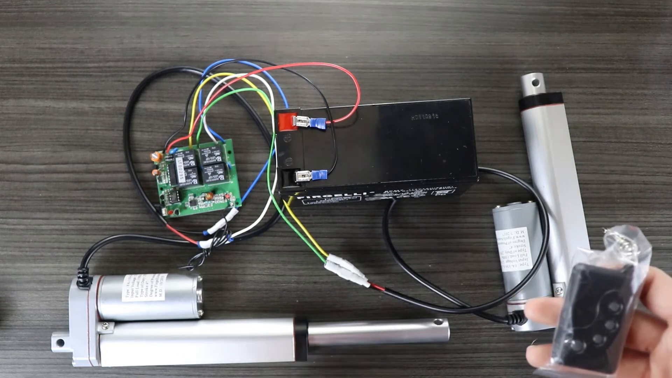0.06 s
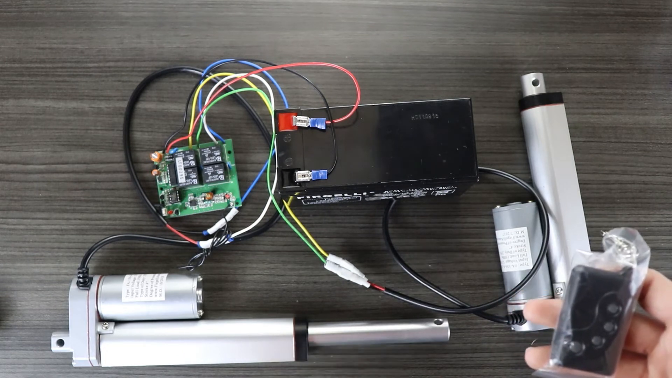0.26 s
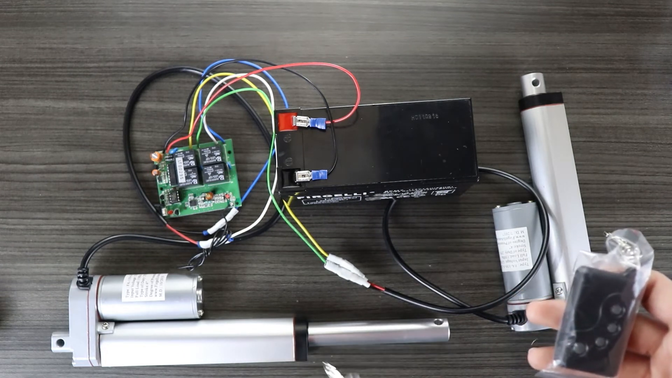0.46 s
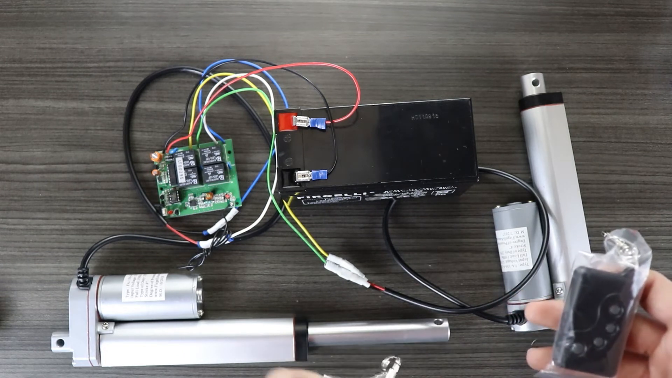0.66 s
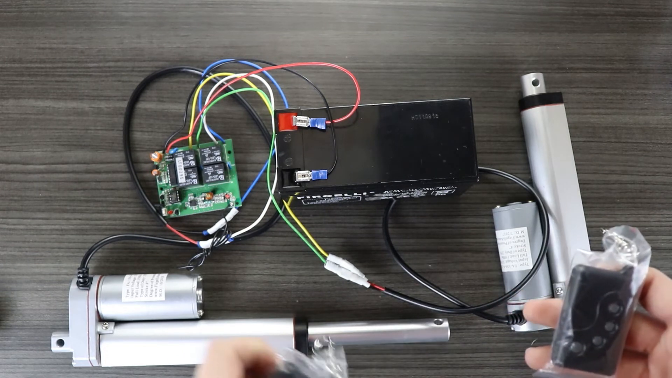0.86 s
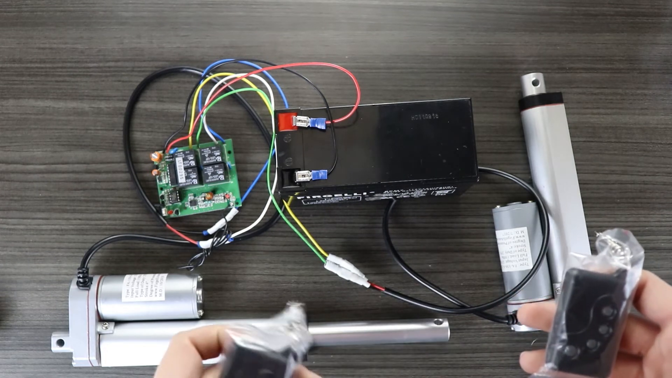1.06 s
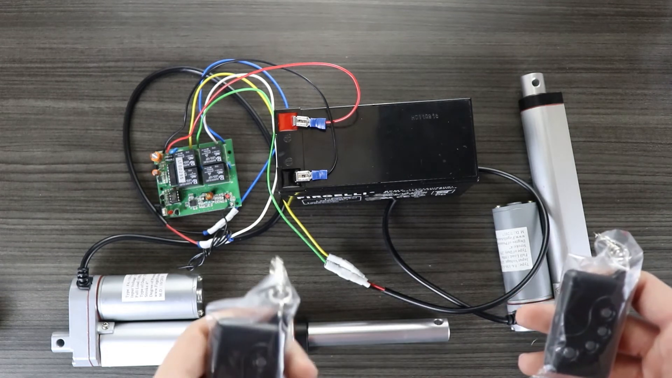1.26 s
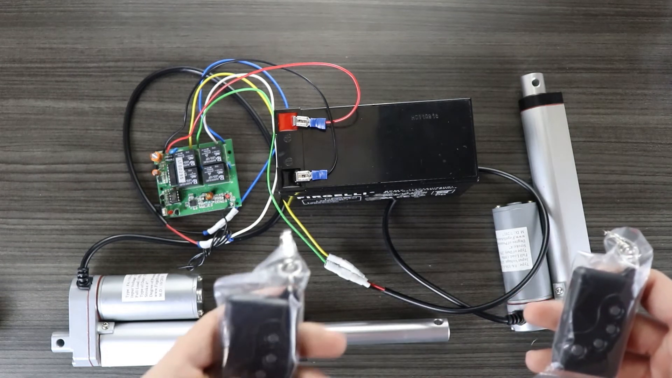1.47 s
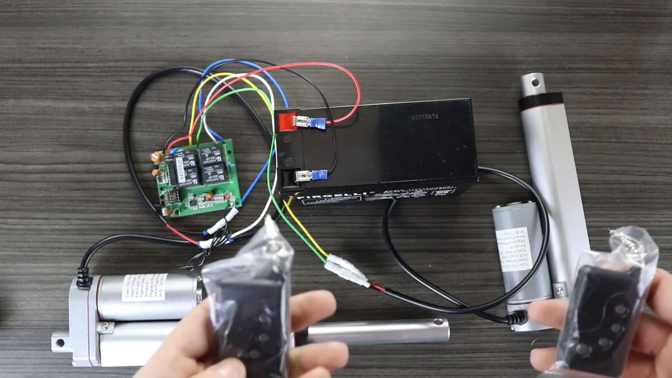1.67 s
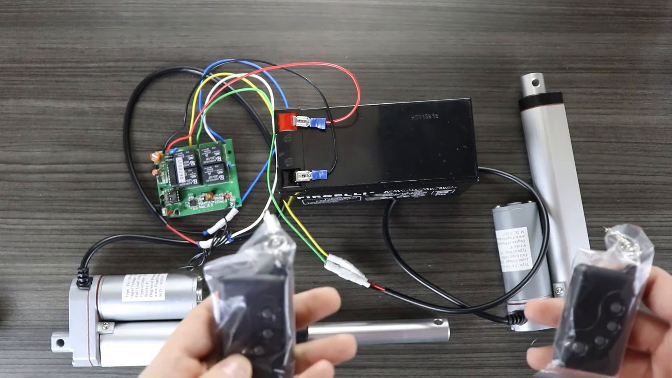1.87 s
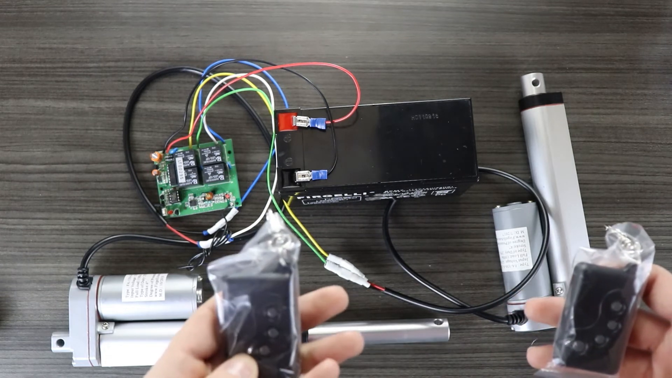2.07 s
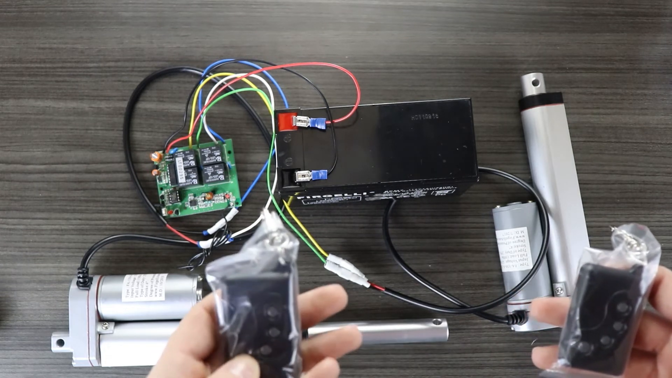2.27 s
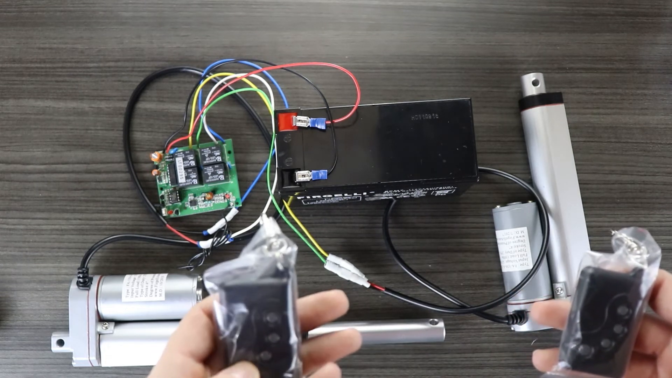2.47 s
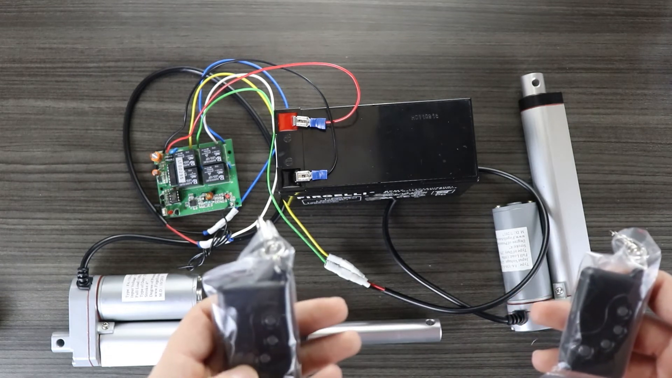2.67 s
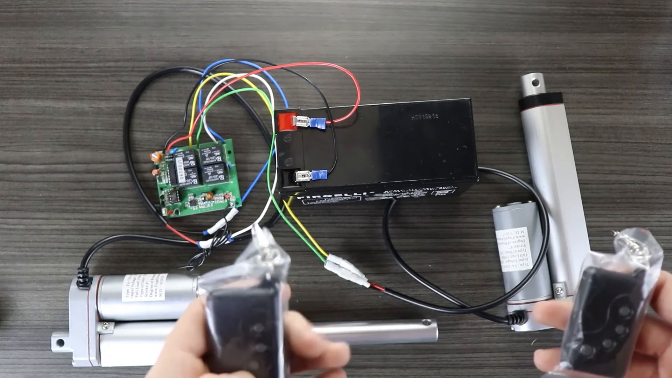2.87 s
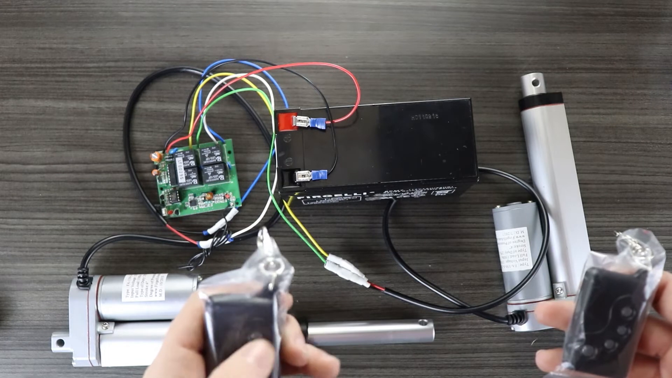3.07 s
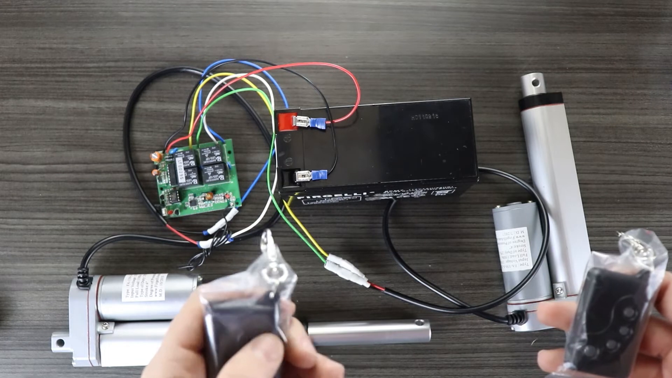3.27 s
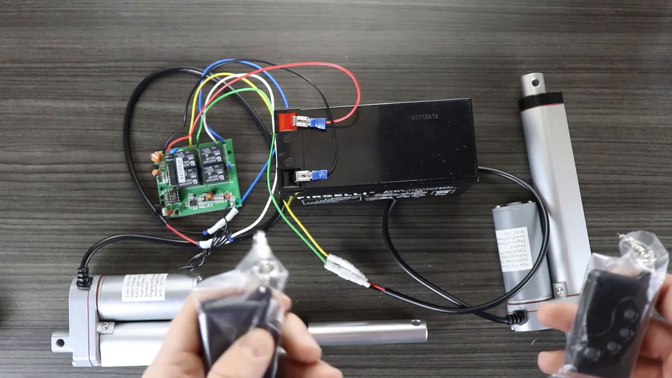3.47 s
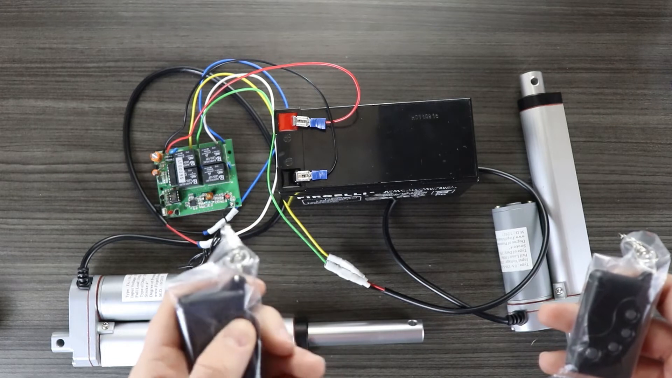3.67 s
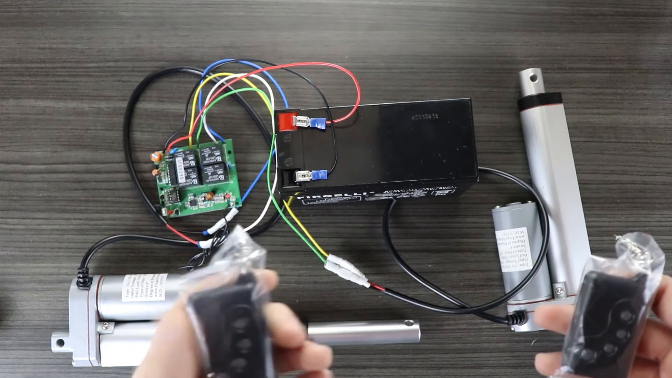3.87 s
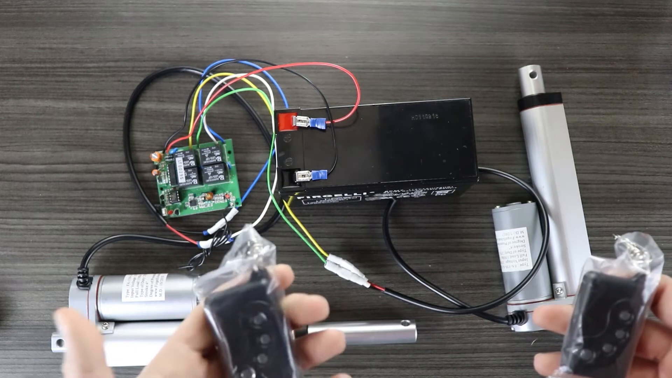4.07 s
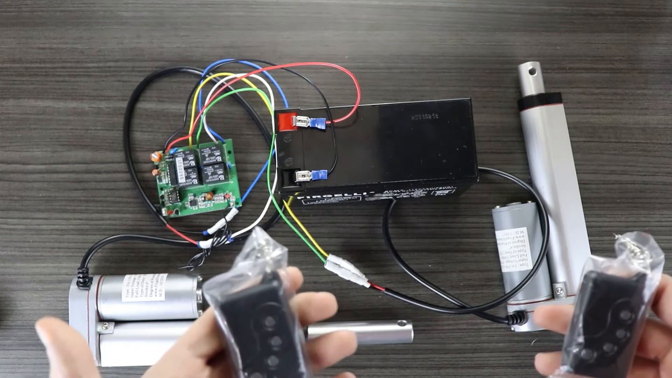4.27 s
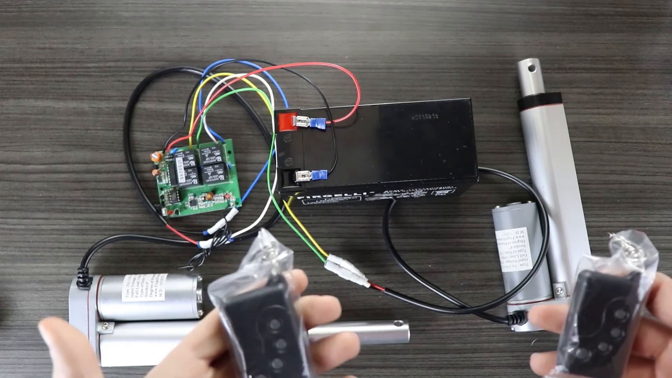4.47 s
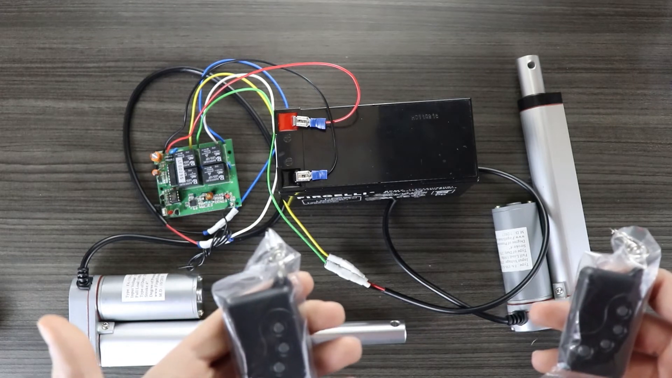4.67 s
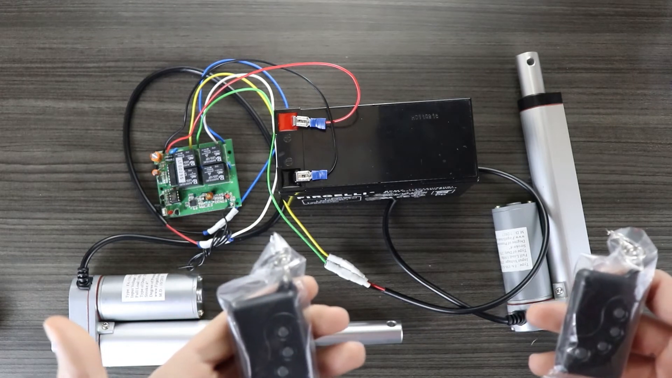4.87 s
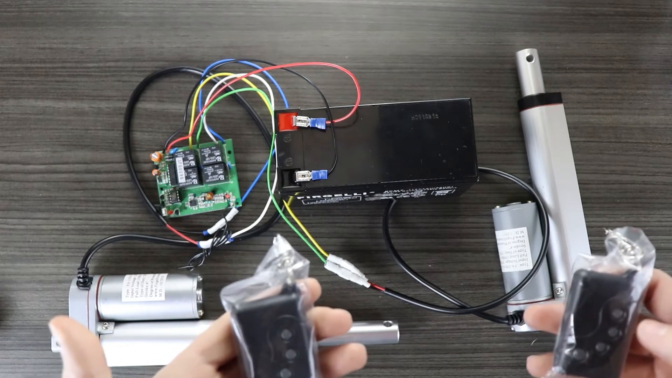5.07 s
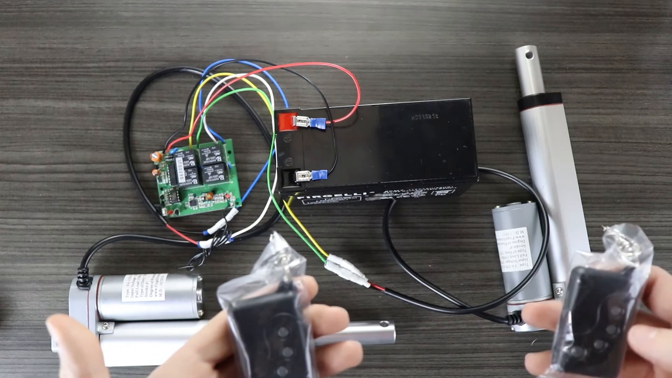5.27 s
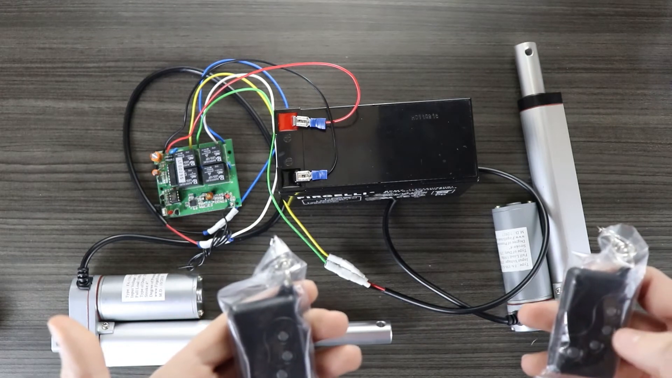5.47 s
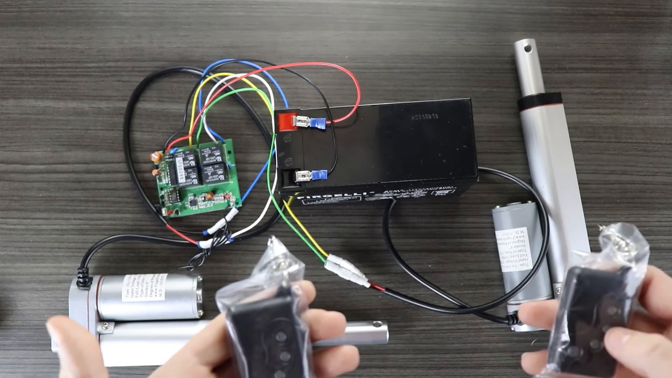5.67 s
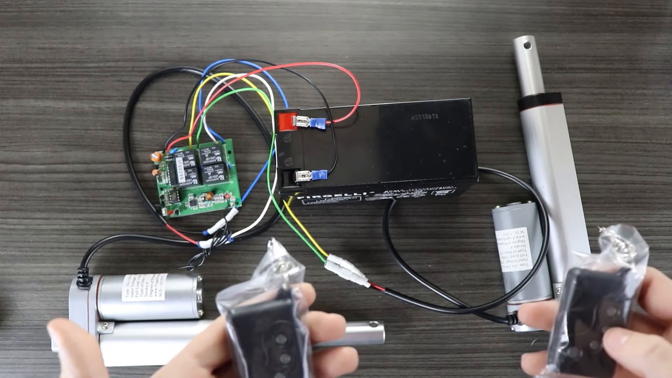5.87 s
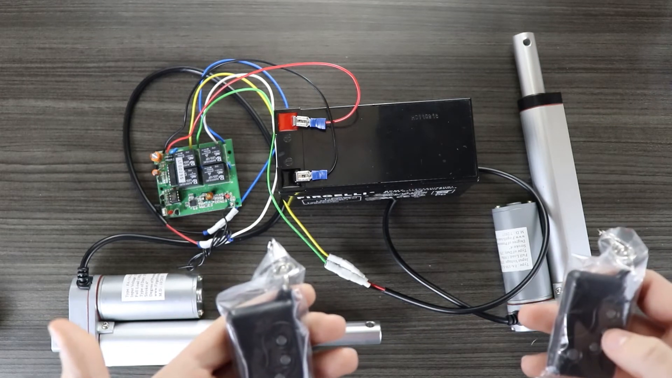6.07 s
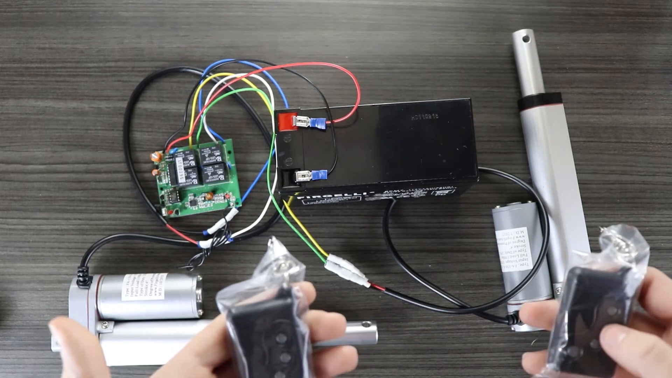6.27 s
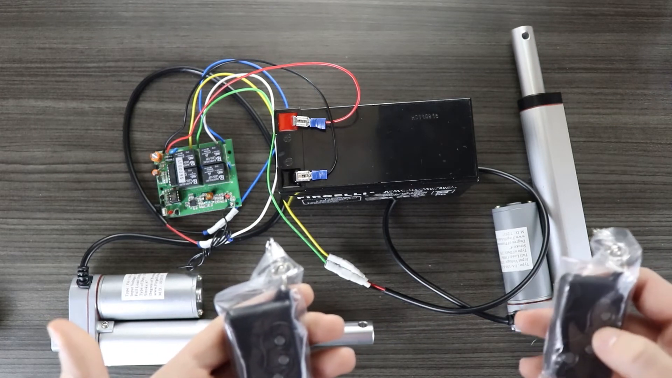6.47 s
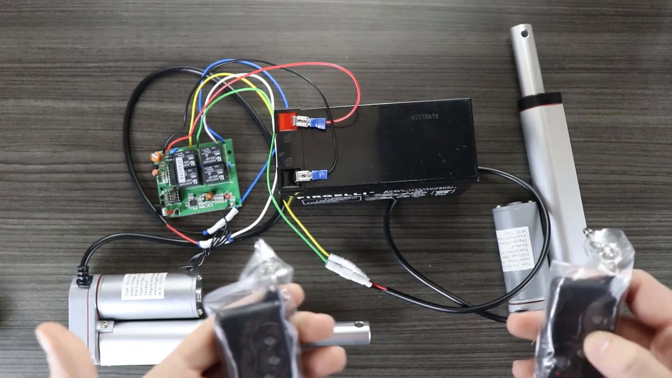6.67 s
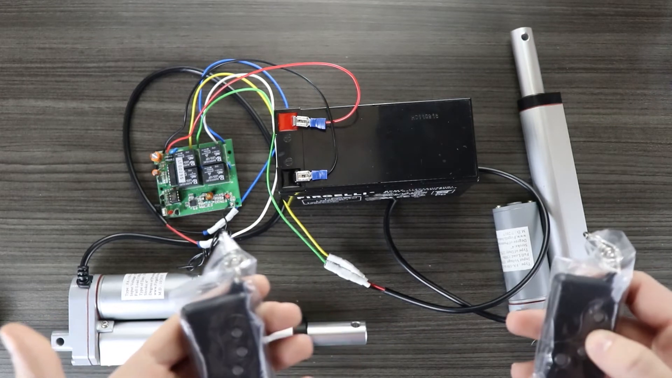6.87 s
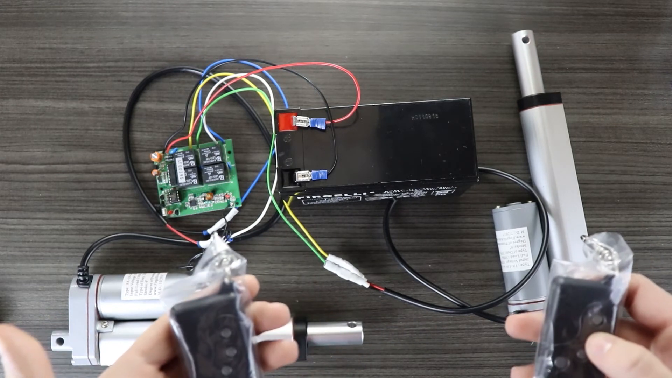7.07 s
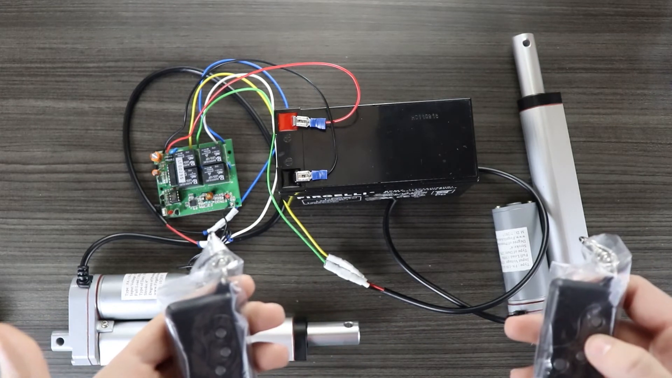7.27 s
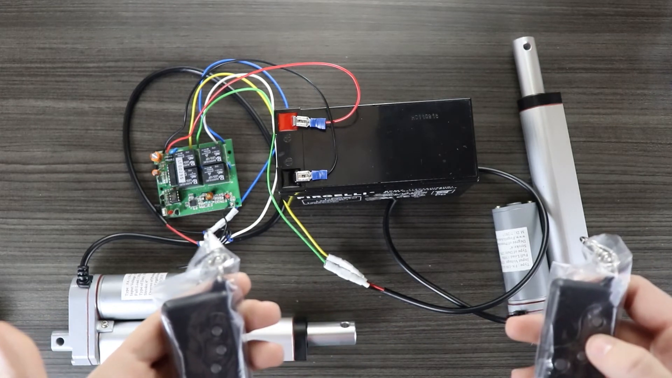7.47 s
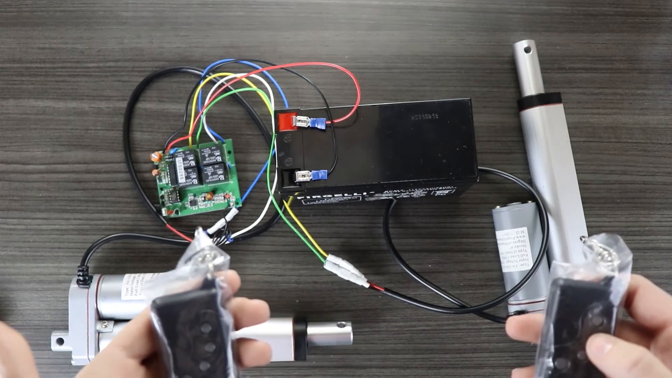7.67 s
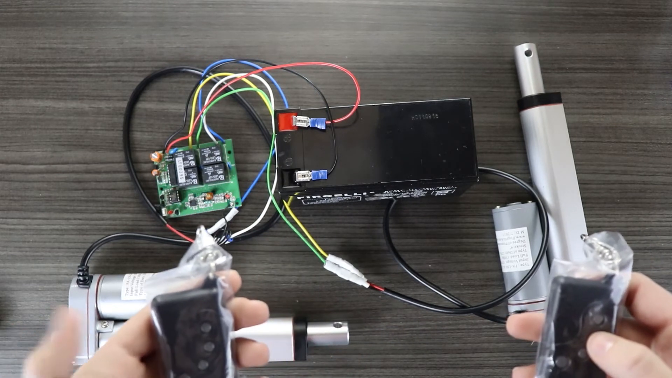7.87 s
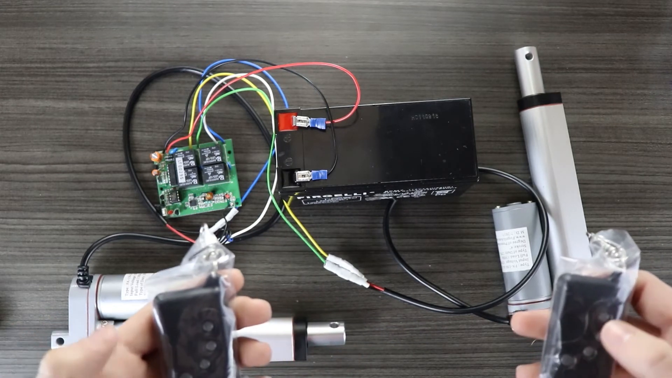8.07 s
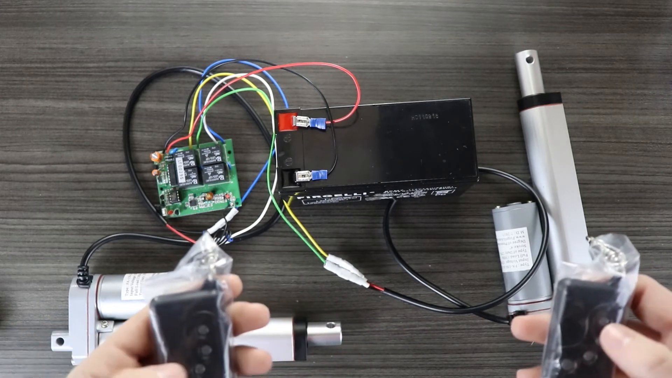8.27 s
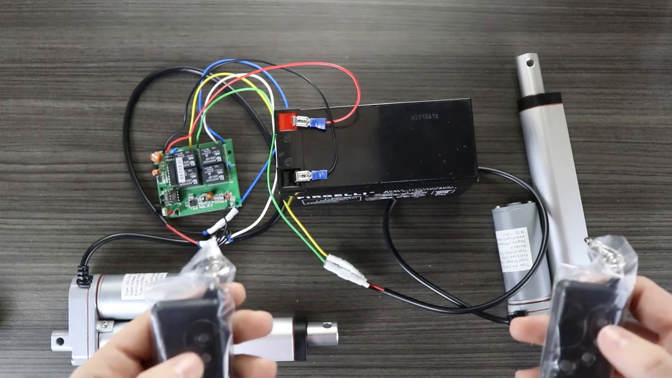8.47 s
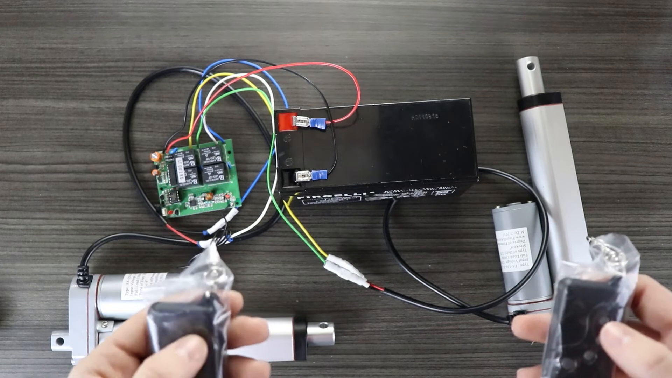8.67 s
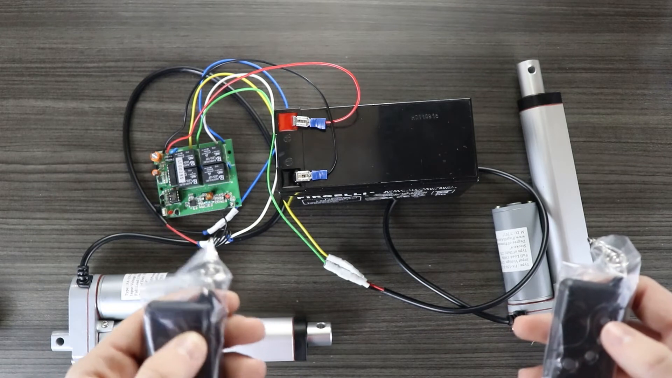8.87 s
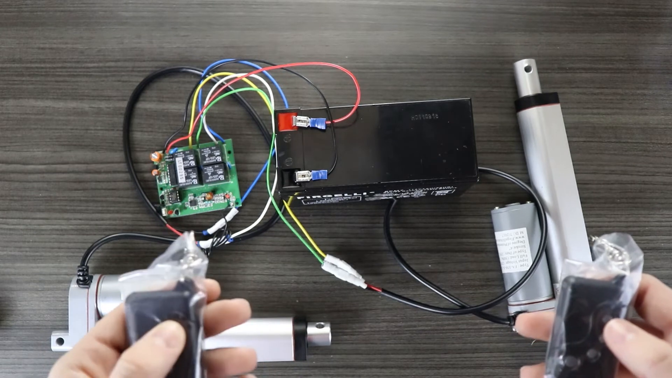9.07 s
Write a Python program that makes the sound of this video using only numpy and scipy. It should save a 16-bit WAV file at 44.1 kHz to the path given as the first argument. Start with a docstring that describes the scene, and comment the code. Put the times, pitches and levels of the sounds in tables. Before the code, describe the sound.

Thin plastic bags crinkle around handheld remote controls. A button snaps, a relay clicks, and a small linear actuator starts a steady gear whine with a fine rattle. After more clicks a second actuator joins, the two whines beating against each other. It reverses with a click and a knock, then both stop, ending on a sharp knock against the desk. The sound is close, in a small room with a faint hum.

```python
"""Two small linear actuators run on a desk: gear whine over a rattle that repeats every shaft turn.
The lying one retracts; the upright one extends, reverses and stops with knocks. Their whines beat.
They are switched by remote controls still in plastic bags: the bags crinkle, a button snaps,
a relay answers. Room tone and a faint hum lie underneath."""
import sys
import numpy as np
from scipy import signal
from scipy.fft import rfft, irfft, next_fast_len
from scipy.io import wavfile
from scipy.ndimage import uniform_filter1d

SR = 44100
rng = np.random.default_rng(int(sys.argv[2]) if len(sys.argv) > 2 else 0)


def to_wav(s):
    """Save 16-bit WAV."""
    ch = np.atleast_2d(s).T  # columns
    pcm = np.round(np.clip(ch, -1, 1) * 32767)  # PCM
    wavfile.write(sys.argv[1], SR, pcm.astype(np.int16))


N = 402191
T = np.arange(N) / SR

# rattle spectra: freq_hz, lying_db, extending_db, retracting_db
RATTLE_SPECTRA = [(50.3, -76, -67, -58), (216, -47.5, -44.5, -52), (400, -50, -37, -42),
                  (800, -36.5, -25, -28), (1100, -39, -31.5, -34.5), (1500, -36.5, -38.5, -39.5),
                  (1790, -40.5, -32, -32.5), (2224, -30.5, -23.5, -25.5), (3380, -31, -32, -36.5),
                  (3790, -38.5, -40.5, -35), (4670, -40.5, -41, -42.5), (6200, -45, -42, -44.5),
                  (9900, -44, -43, -47), (16000, -51, -44, -48.5)]
# upright motor runs: on_s, off_s, settled_hz, shortfall_hz, spin_up_s, mesh_s
UPRIGHT_MOTOR_RUNS = [(3.66, 6.74, 49.696, .591, .02, .2), (6.75, 9.025, 50.601, .385, .0245, .05)]


def undb(db):
    """Decibels to gain."""
    return np.exp(np.asarray(db) * (np.log(10) / 20))


def colour(x, points, bumps=()):
    """Filter by (freq_hz, gain_db) points plus (centre_hz, width_hz, lift_db) resonances."""
    f = np.arange(x.shape[-1] // 2 + 1) * SR / x.shape[-1] + 1
    hz, db = np.transpose(points)
    base_db = np.interp(np.log(f), np.log(hz), db)
    bump_db = sum(lift / (1 + (2 * (f - centre) / width) ** 2) for centre, width, lift in bumps)
    return irfft(rfft(x) * undb(base_db + bump_db), x.shape[-1])


def long_colour(x, points, bumps=()):
    """colour() for scene-length signals."""
    return colour(np.pad(x, ((0, 0), (0, next_fast_len(N, True) - N))), points, bumps)[:, :N]


def stereo(pair):
    """Mid and side to left and right: alike in the bass, unrelated in the treble."""
    # stereo width: freq_hz, side_gain_db
    side_spectrum = [(100, -20), (700, -8.5), (1300, -4.5), (2400, -5), (4400, -2), (8000, -0.5),
                     (15000, 1)]
    side = long_colour(pair[1:], side_spectrum)[0]
    return np.array([pair[0] + side, pair[0] - side])


def pan(db):
    """Channel gains, db = left minus right."""
    return undb(np.array([[db], [-db]]) / 2)


def band(x, hz, width_hz):
    """One resonance, unity gain at its centre."""
    hz = min(hz, .45 * SR)
    return signal.lfilter(*signal.iirpeak(hz, hz / min(width_hz, SR / 3), fs=SR), x)


def steep_band(x, hz, width_hz):
    """The same resonance twice in series."""
    return band(band(x, hz, width_hz), hz, width_hz)


def walk(rate_hz):
    """Smooth random drift, spread near 1."""
    size = int(SR / rate_hz)
    return uniform_filter1d(np.repeat(rng.standard_normal(N // size + 1), size), size)[:N]


def burst(t60_s, tail_db, tail_t60_s):
    """Two decaying noise bursts with faint tails."""
    t = T[:SR // 4]
    envelope = 1000 ** (-t / t60_s) + undb(tail_db) * 1000 ** (-t / tail_t60_s)
    return rng.standard_normal((2, len(t))) * envelope


def strength(x, db):
    """Scale a hit to the energy of 1 ms at db rms."""
    return x * undb(db) / np.sqrt(np.sum(x ** 2, axis=-1, keepdims=True) * 1000 / SR)


def add(out, start_s, sound):
    """Mix sound into out."""
    i = int(start_s * SR)
    out[:, i:i + sound.shape[-1]] += sound[..., :N - i]


def room_tone():
    """Low noise and a faint, wavering hum."""
    # background spectrum: freq_hz, gain_db
    spectrum = [(25, -51), (55, -47.5), (85, -49), (250, -45), (450, -51.5), (1000, -57), (3000, -65),
                (8000, -96), (16000, -77)]
    air = stereo(long_colour(rng.standard_normal((2, N)), spectrum))
    return air + undb(-37.5) * steep_band(rng.standard_normal(N), hz=223, width_hz=13)


def reverb(x, t60_s, wet_db):
    """Short, dull tail of a small room."""
    t = T[:SR // 2]
    tail = rng.standard_normal((2, len(t))) * 1000 ** (-t / t60_s) * (t > .006)
    tail = colour(tail, [(300, 3), (900, 4), (2000, 2), (7000, .5), (16000, -12)])
    tail /= np.sqrt(np.sum(tail ** 2) / 2)
    return undb(wet_db) * signal.fftconvolve(x, tail, axes=1)[:, :N]


def desk_rumble(start_s=.023, end_s=.107, rise_db_per_s=350, fall_db_per_s=3000):
    """The desk rumbles briefly."""
    rise_db = rise_db_per_s * np.maximum(start_s - T, 0)
    fall_db = fall_db_per_s * np.clip(T - end_s, 0, .5)
    spectrum = [(30, -20), (100, -9), (170, -1), (260, -7), (400, -16), (2500, -27)]
    return long_colour(rng.standard_normal((1, N)), spectrum) * undb(-23.5 - rise_db - fall_db)


def ringing_tick(db, hz):
    """A sharp tick with a slight ring."""
    crack = band(burst(t60_s=.008, tail_db=-11, tail_t60_s=.035), hz, hz)
    return strength(band(crack, hz, hz / 2) + undb(4) * crack, db - 5)


def bags_and_gear_knock(faint_count=26, lift_s=1.8):
    """Bag creases flip: loud with a hollow body, faint on lifting, tiny as rustle. One gear knock."""
    # bag creases; last row a gear knock after the lying motor starts: start_s, level_db, centre_hz, body_db
    loud_hits = [(0.051, -25, 3470, -35), (0.1256, -30.5, 9000, -45), (0.2727, -31.5, 5900, -51),
                 (0.3125, -24.5, 6740, -38), (0.5736, -28.5, 5270, -56), (0.603, -32, 3600, -57),
                 (0.6175, -29.5, 4180, -39), (0.6526, -21.5, 5300, -58), (0.6893, -20, 4980, -45),
                 (0.7216, -22.5, 3800, -49), (0.8045, -21, 5330, -38), (0.9025, -20, 1600, -54),
                 (1.0157, -27.5, 3300, -44), (1.1425, -18.5, 5700, -44), (1.5147, -34, 8130, -56),
                 (1.536, -23.5, 4500, -40.5), (1.6361, -25, 4670, -44), (1.8302, -32, 4170, -41.5),
                 (2.15, -27.5, 6790, -41.5), (2.1875, -20.5, 3230, -86), (2.354, -22, 2200, -34)]
    # rustle envelope: time_s, level_db
    rustle_levels = [(0.0, -50), (0.38, -58), (0.83, -64), (0.96, -59.5), (1.62, -58.5), (1.9, -69.5),
                     (2.06, -74)]
    out = np.zeros((2, N))
    rustle_db = np.interp(T, *np.transpose(rustle_levels))
    stir = undb(rustle_db - .5)[None]
    settling = 1000 ** (-T[:SR // 2] / .33)  # rustle lingers after each loud hit
    for start_s, db, hz, body_db in loud_hits:
        push = burst(t60_s=.019, tail_db=-14, tail_t60_s=.02)
        body = steep_band(push, 1130, 1100) + undb(-1) * steep_band(push, 590, 350)
        add(out, start_s, ringing_tick(db, hz) + strength(body, body_db))
        add(stir, start_s, undb(db - 32.5) * settling)
    for k, (when, loud, high) in enumerate(rng.uniform(-1, 1, (faint_count, 3))):
        start_s = lift_s * (k + .5 + .5 * when) / faint_count
        db = rustle_db[int(start_s * SR)] + 17.5 + 4 * loud
        add(out, start_s, ringing_tick(db, hz=2800 * 2 ** (.8 * high)))
    grains = rng.standard_normal((2, N)) * undb(4.2 * np.minimum(rng.exponential(size=N), 6.5))
    rustle = long_colour(grains, [(200, -5.5), (1200, -2), (4500, -2), (9000, -7), (16000, -3.5)])
    flicker = undb(3 * walk(rate_hz=49))  # fingers shift
    out += rustle / rustle.std() * stir * flicker
    return stereo(long_colour(out, [(3000, 0), (7500, 1), (10000, -2.5), (16000, -9.5)])) * pan(-.69)


def plastic_ticks():
    """Sharp plastic ticks: four button snaps and two bag crinkles."""
    # button snaps, with bag crinkles in rows 2 and 3: start_s, level_db, centre_hz
    ticks = [(2.089, -13.5, 6900), (3.062, -24, 7610), (3.3607, -24, 10500), (3.502, -15.5, 5700),
             (6.5907, -22.5, 4900), (8.8782, -14.5, 4600)]
    out = np.zeros((2, N))
    for start_s, db, hz in ticks:
        tick = band(burst(t60_s=.006, tail_db=-24, tail_t60_s=.05), hz, .71 * hz)
        add(out, start_s, strength(tick, db - 2))
    return stereo(out) * pan(-2.5)


def relays():
    """An armature hits its contact and the relay rings."""
    # armature hits: start_s, level_db, centre_hz
    clicks = [(2.2308, -13, 6460), (3.6449, -10.5, 9000), (6.7323, -9, 6100), (9.0213, -9.5, 8800),
              (9.0423, -27, 8770)]
    # relay resonances: freq_hz, width_hz, gain_db
    relay_modes = [(3370, 210, 14), (5260, 550, 2), (6300, 300, 11), (8660, 1600, 10), (12000, 1100, -2),
                   (13600, 360, -13)]
    out = np.zeros((2, N))
    for start_s, db, hz in clicks:
        blow = burst(t60_s=.027, tail_db=-21, tail_t60_s=.055)
        ring = sum(undb(gain_db) * band(blow, f, width) for f, width, gain_db in relay_modes)
        add(out, start_s, strength(band(ring, hz, hz / 2), db - 5))
        add(out, start_s, strength(band(blow, 12700, 6000), db - 12))
    return stereo(out) * pan(-2.5)


def knocks():
    """Gears take up their play: each jolt rings the casing and makes the desk boom."""
    # jolts: start_s, casing_db, desk_db
    jolts = [(2.243, -45, -39), (3.663, -23.5, -22), (3.68, -38, -19), (6.749, -16.5, -16),
             (6.78, -21, -23), (6.798, -35, -24.5), (9.032, -20, -16.5), (9.042, -33, -22.5),
             (9.081, -6, -17.5)]
    # casing modes: freq_hz, t60_s, level_db
    casing_modes = [(623, 0.028, -14), (788, 0.032, 9.5), (907, 0.054, -7), (1220, 0.048, -9),
                    (1290, 0.041, -12), (2210, 0.036, -4), (2890, .015, -14)]
    # desk resonances: freq_hz, nominal_width_hz, gain_db
    desk_modes = [(197, 60, -8), (272, 90, -2.5), (426, 310, -6), (1030, 250, -4.5)]
    out, t = np.zeros((2, N)), T[:SR // 4]
    ring = sum(undb(db) * np.cos(2 * np.pi * hz * t) * 1000 ** (-t / t60) for hz, t60, db in casing_modes)
    ring = band(band(ring, 800, 2400), 1140, 2400)  # soft contact
    for start_s, casing_db, desk_db in jolts:
        push = burst(t60_s=.16, tail_db=-15, tail_t60_s=.33)[0]
        boom = sum(undb(db) * steep_band(push, hz, 1.75 * width) for hz, width, db in desk_modes)
        boom = band(boom, 230, 500)  # the thin top radiates little below its first mode
        add(out, start_s, strength(ring, casing_db + 2) + strength(boom, desk_db + 1))
    return out


def motor(runs, settle_s=.546, coast_tau_s=.33, slack_drag=.017):
    """Spin-up, creep to settled speed, coast-down; loose falls from 1 to 0 as the gears mesh."""
    runs = np.array(runs)
    latest = np.maximum(np.searchsorted(runs[:, 0], T) - 1, 0)
    on_s, off_s, settled_hz, shortfall_hz, spin_up_s, mesh_s = runs[latest].T
    age_s, coast_s = np.maximum(T - on_s, 0), np.maximum(T - off_s, 0)
    loose = .5 - .5 * np.tanh((age_s - mesh_s) / .02)
    driven_hz = (settled_hz - shortfall_hz * np.exp(-age_s / settle_s)) * (1 - np.exp(-age_s / spin_up_s))
    speed_hz = driven_hz * (1 - slack_drag * loose) * np.exp(-coast_s / coast_tau_s)
    return speed_hz, age_s, coast_s, loose


def shaft(speed_hz, wobble_turns):
    """Turns so far; the rotor runs slightly ahead and behind."""
    return np.cumsum(speed_hz) / SR + wobble_turns * (walk(45) + walk(9))


def drive_gains(age_s, coast_s, loose, rise_s, fade_db_per_s, unmeshed_db=-12, unloaded_db=-8.5):
    """Rattle, whine and buzz gains: meshed gears whine, loose ones buzz, all fade when coasting."""
    running = (1 - np.exp(-age_s / rise_s)) * undb(-fade_db_per_s * coast_s)
    singing = running ** 2 * (1 - np.exp(-(age_s / .055) ** 2))  # teeth sing only near full speed
    unloaded = 1 - np.exp(-coast_s / .012)
    meshed = singing * undb(unmeshed_db * loose + unloaded_db * unloaded)
    return running, meshed, singing * loose


def rattle(turns, gear_orders, repeat_share, throb, brush):
    """Teeth and brushes scrape alike each turn, plus fresh chatter; shaft and commutator pulse both."""
    size = SR // 50
    overtones = rfft(rng.standard_normal((2, size)))
    overtones[:, np.round(gear_orders).astype(int)] = 0  # left to the gear tones
    one_turn = 8 * irfft(overtones, size * 8)
    repeated = one_turn[:, (turns % 1 * one_turn.shape[1]).astype(int)]
    commutator = np.cos(2 * np.pi * 12 * turns)
    gate = 1 + throb * np.cos(2 * np.pi * turns) + brush * commutator
    chatter = rng.standard_normal((2, N))
    scrape = gate * (np.sqrt(repeat_share) * repeated + np.sqrt(1 - repeat_share) * chatter)
    mode_hz = np.arange(3600, 16000, 100)  # narrow modes of the metal tube
    mode_db = 2.3 * rng.standard_normal(len(mode_hz)) * (mode_hz > mode_hz[0])
    return long_colour(scrape, np.transpose([mode_hz, mode_db]))


def whine(turns, orders, levels_db, flutter_db, apart_hz):
    """Gear tones on whole multiples of the shaft rate; the 16-tooth mesh is steadiest."""
    out = np.zeros((2, N))
    shaft_rad = 2 * np.pi * (turns % 1)
    for order, db in zip(np.round(orders), levels_db):
        drift_db = flutter_db * (1 if order == 16 else 2) * walk(40)
        amplitude = np.sqrt(2) * undb(db + drift_db)
        phase_rad = order * shaft_rad + order ** 2  # each tone leaves the housing with its own phase
        apart_rad = min(order * 50 / apart_hz, 1) ** 2 * rng.choice([-1, 1])
        out[0] += amplitude * np.sin(phase_rad + apart_rad)
        out[1] += amplitude * np.sin(phase_rad - apart_rad)
    return out


def slack_buzz(turns):
    """Gears buzz until the load takes up their play."""
    # loose-gear tones: shaft_order, level_db
    tones = [(15, -45), (19, -63), (22, -50.5), (23, -49), (32, -50), (34, -57), (45, -57), (46, -46),
             (67, -39.5)]
    return whine(turns, *np.transpose(tones), flutter_db=2.5, apart_hz=4520)


def upright_actuator():
    """Extends, then retracts with the load on the other tooth flanks."""
    # gear tones: shaft_order, extending_db, retracting_db
    tones = [(2, -77, -127), (11, -57.5, -52), (12, -45.5, -54), (16, -38.5, -36), (18, -44, -50),
             (24, -53, -48), (41, -58, -44), (46, -47.5, -43.5), (48, -39.5, -66), (64.3, -44.5, -56),
             (66.26, -57, -69), (75.3, -53, -74)]
    # metal housing resonances: centre_hz, width_hz, lift_db
    housing = [(4350, 120, 1.4), (4770, 170, 8.1), (5680, 280, 8), (7700, 92, 3.4), (8050, 120, 1.8),
               (8600, 290, 3.4), (9630, 630, 6.9), (10500, 460, 3.8), (13200, 380, 3.6)]
    orders, spectra = np.array(tones)[:, 0], np.array(RATTLE_SPECTRA)
    speed_hz, age_s, coast_s, loose = motor(UPRIGHT_MOTOR_RUNS)
    turns = shaft(speed_hz, wobble_turns=.00038)
    running, meshed, buzzing = drive_gains(age_s, coast_s, loose, rise_s=.033, fade_db_per_s=98)
    retracting = T > UPRIGHT_MOTOR_RUNS[1][0]
    levels_db = (np.where(retracting, in_db, out_db) for _, out_db, in_db in tones)
    gears = whine(turns, orders, levels_db, flutter_db=1.58, apart_hz=3920) * meshed * undb(-3)
    gears += slack_buzz(turns) * buzzing * undb(-4)
    noise = rattle(turns, orders, repeat_share=.2, throb=.089, brush=.27) * running
    scrape = long_colour(noise * ~retracting * undb(-.37), spectra[:, [0, 2]], housing)
    scrape += long_colour(noise * retracting * undb(2.03), spectra[:, [0, 3]], housing)
    return gears * pan(1) + stereo(scrape) * pan(.43)


def by_rod(far_db, half_db, near_db):
    """Level following the lying rod inward."""
    # rod travel: leaves_far_s, reaches_half_s, leaves_half_s, nearly_in_s
    rod_times = [3.4, 4.2, 6.3, 7.2]
    return np.interp(T, rod_times, [far_db, half_db, half_db, near_db])


def lying_actuator(supply_sag=.00865, inrush_sag=.0057, recover_s=.2, rasp_db_per_s=8):
    """Retracts, its tones shifting with rod travel; the other motor loads its supply."""
    # motor run: on_s, off_s, settled_hz, shortfall_hz, spin_up_s, mesh_s
    runs = [(2.23, 8.805, 50.87, 0, .02, .25)]
    # gear tones by rod position: shaft_order, far_db, half_db, near_db
    tones = [(2, -67.5, -70.5, -68), (4, -56, -66, -61.5), (12, -43, -40, -40), (13, -54, -53, -50),
             (14, -63, -68, -109), (15, -51, -65, -47), (16, -30.5, -31, -26.5), (17, -47.5, -55, -52.5),
             (22, -58, -59, -57.5), (23, -51, -56.5, -50.5), (24, -107, -54.5, -68), (29, -58, -55, -52),
             (32, -54, -54.5, -51.5), (44, -51.5, -85, -80), (49, -48.5, -57, -56), (54, -69, -120, -52),
             (55, -49.5, -50.5, -65), (58, -50.5, -130, -88), (61, -64, -48.5, -52),
             (63.53, -47.5, -44, -43), (62.2, -58, -120, -92), (67.5, -47.5, -49.5, -50.5)]
    # metal housing resonances: centre_hz, width_hz, lift_db
    housing = [(4530, 200, 6.5), (4880, 160, 5.5), (5830, 100, 10), (7400, 270, 8.5), (8520, 130, 2.5),
               (8960, 150, -0.5), (9560, 220, 5), (9660, 220, 0), (10100, 330, 2), (10880, 300, 5.5),
               (12800, 230, 3), (13290, 110, 2.7)]
    orders, spectrum = np.array(tones)[:, 0], np.array(RATTLE_SPECTRA)[:, :2]
    speed_hz, age_s, coast_s, loose = motor(runs)
    other_age_s = motor(UPRIGHT_MOTOR_RUNS)[1]
    shared = other_age_s > 0
    sag = shared * (supply_sag + inrush_sag * np.exp(-other_age_s / recover_s))
    starved = shared * np.exp(-(other_age_s / .055) ** 2)  # brief dip as the other motor starts
    turns = shaft(speed_hz * (1 - sag), wobble_turns=.0004)
    running, meshed, buzzing = drive_gains(age_s, coast_s, loose, rise_s=.016, fade_db_per_s=80)
    levels_db = (by_rod(*row[1:]) for row in tones)
    gears = whine(turns, orders, levels_db, flutter_db=.5, apart_hz=5170)
    gears *= meshed * undb(-.94 - 8.5 * starved)
    gears += slack_buzz(turns) * buzzing * undb(-2)
    noise = rattle(turns, orders, repeat_share=.45, throb=.19, brush=.15) * running * undb(-2.5 * starved)
    scrape = long_colour(noise * undb(by_rod(3.5, -.5, 2)), spectrum, housing)
    rasp = noise * undb(-33.5 + rasp_db_per_s * (T - runs[0][1]))  # the screw rasps as the rod comes in
    scrape += steep_band(rasp, hz=4260, width_hz=1200)
    return gears * pan(1.95) + stereo(scrape) * pan(-3)


def scene():
    """Both actuators, handling sounds and knocks with their reverb, room tone."""
    hits = bags_and_gear_knock() + plastic_ticks() + relays() + knocks() + desk_rumble()
    air = room_tone()
    return lying_actuator() + upright_actuator() + hits + reverb(hits, t60_s=.14, wet_db=-19) + air


def record(dry, ceiling=.46, top_hz=16000):
    """Soft peak limiter, then a steep low-pass."""
    limited = dry / (1 + (dry / ceiling) ** 6) ** (1 / 6)
    return signal.sosfilt(signal.ellip(10, .2, 70, top_hz, fs=SR, output="sos"), limited)


dry = scene()
out = record(dry)
to_wav(out)
```